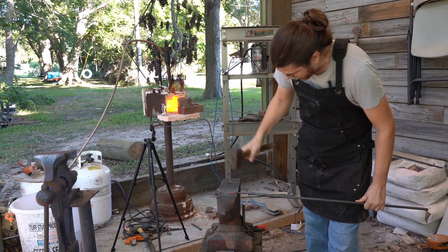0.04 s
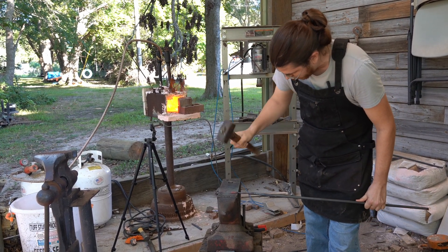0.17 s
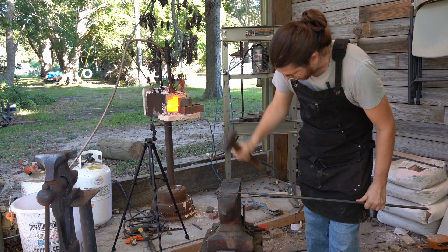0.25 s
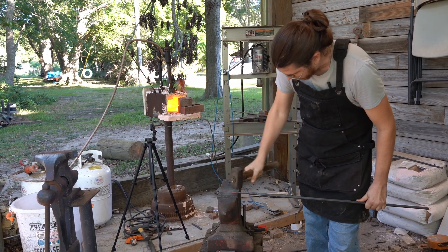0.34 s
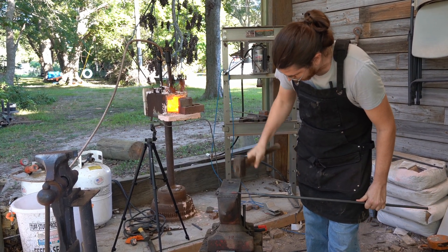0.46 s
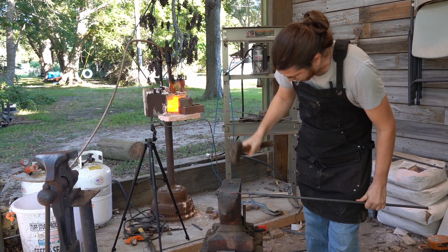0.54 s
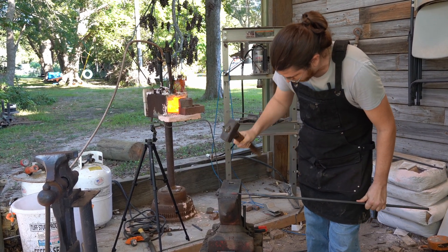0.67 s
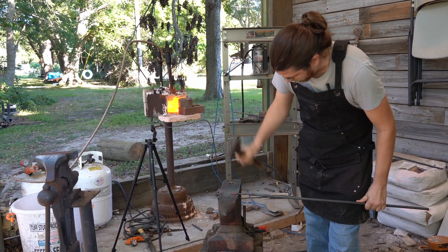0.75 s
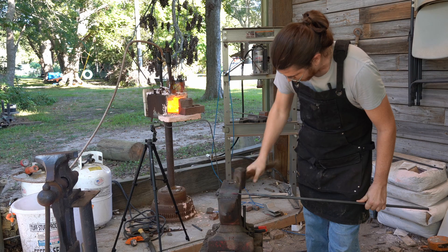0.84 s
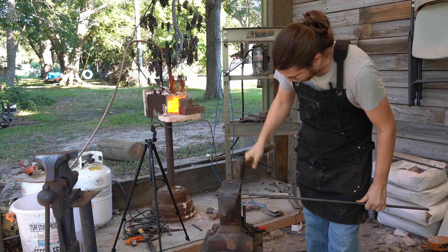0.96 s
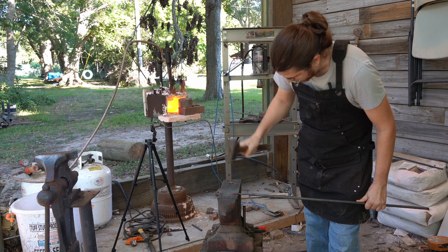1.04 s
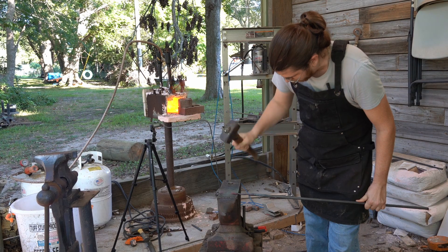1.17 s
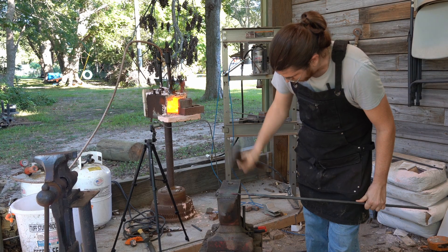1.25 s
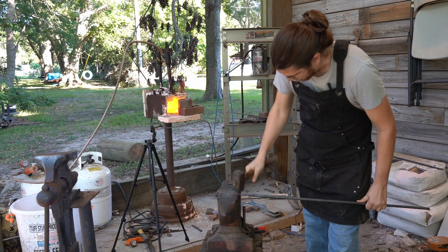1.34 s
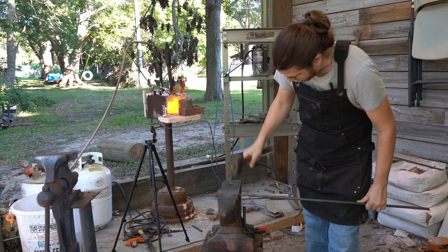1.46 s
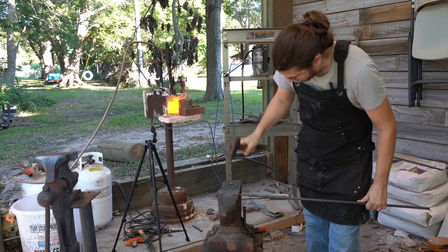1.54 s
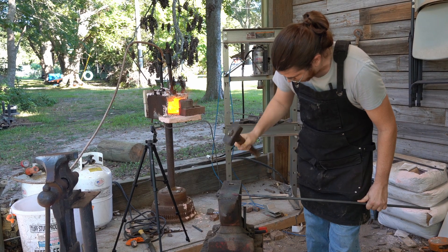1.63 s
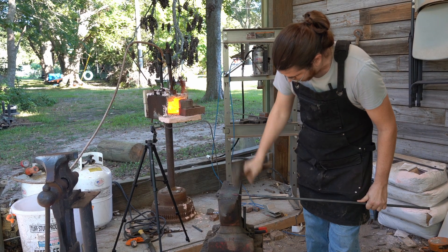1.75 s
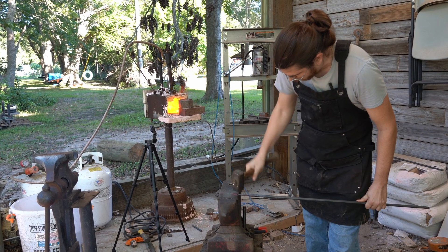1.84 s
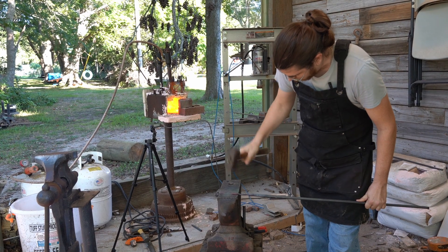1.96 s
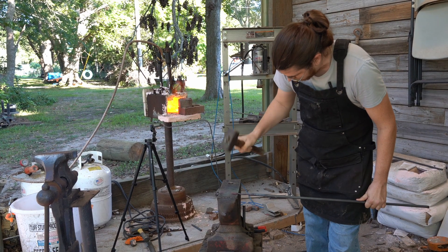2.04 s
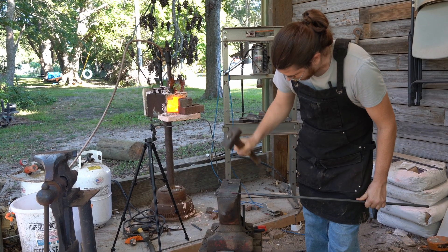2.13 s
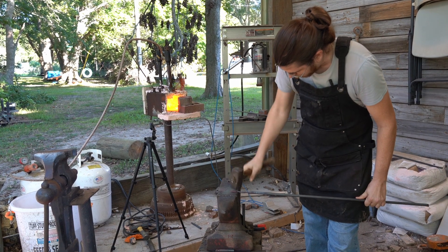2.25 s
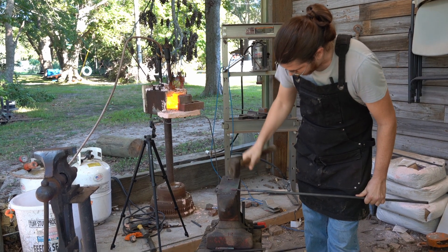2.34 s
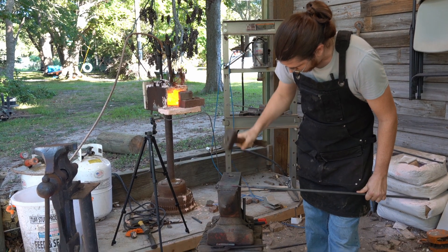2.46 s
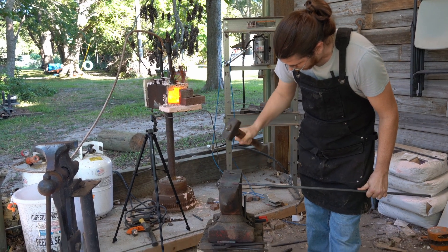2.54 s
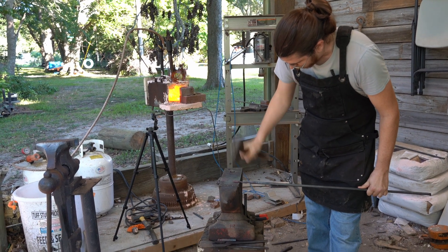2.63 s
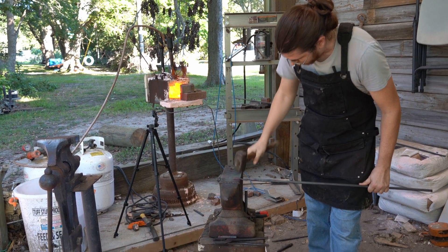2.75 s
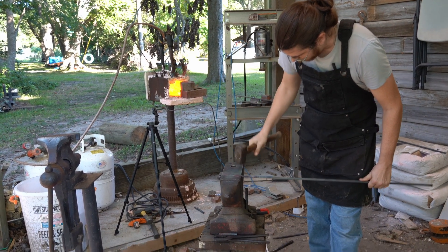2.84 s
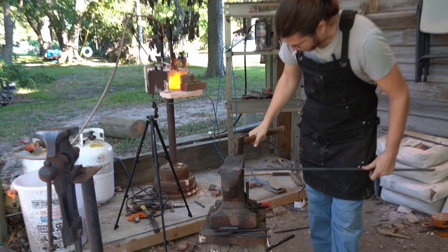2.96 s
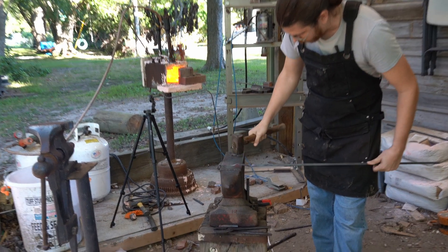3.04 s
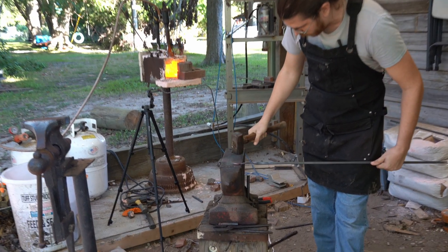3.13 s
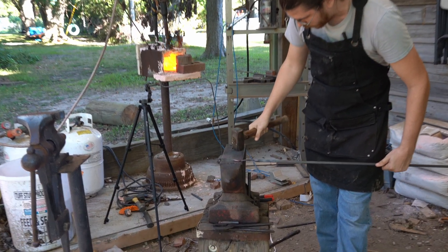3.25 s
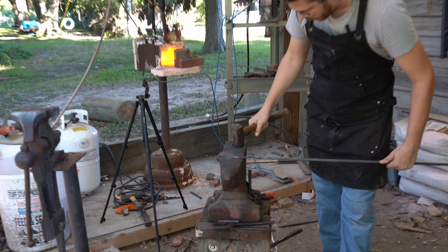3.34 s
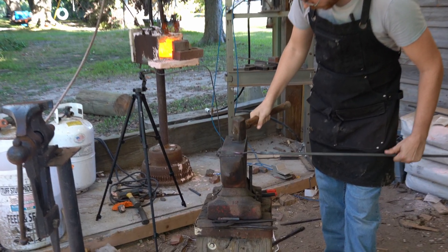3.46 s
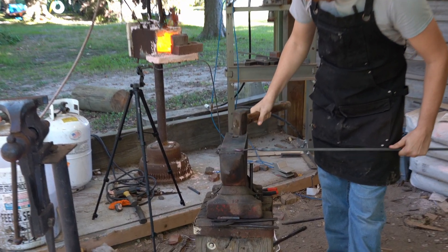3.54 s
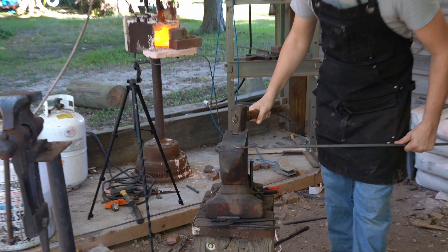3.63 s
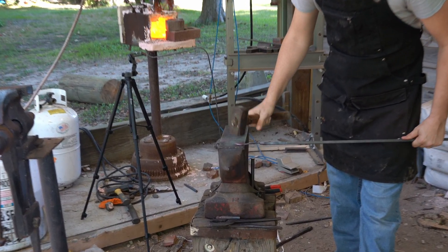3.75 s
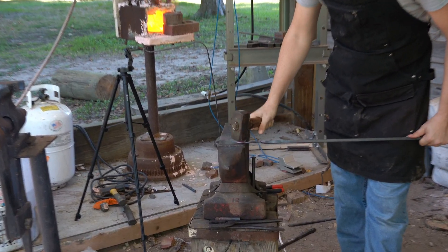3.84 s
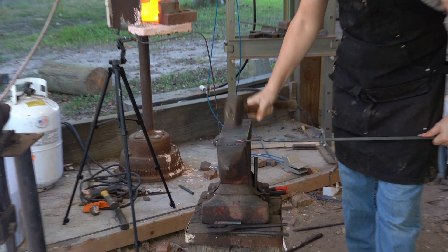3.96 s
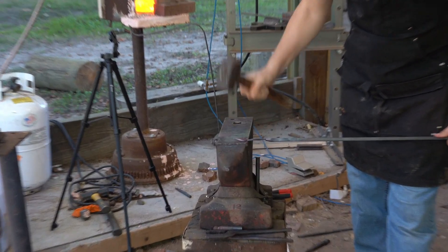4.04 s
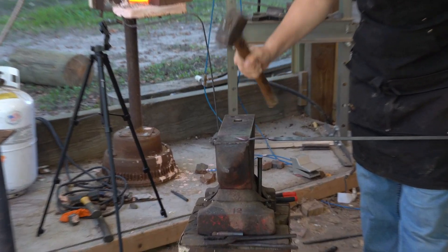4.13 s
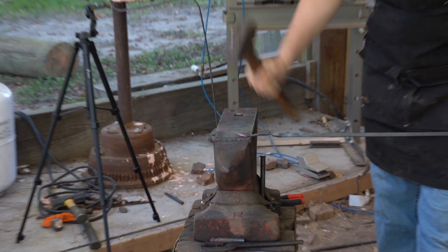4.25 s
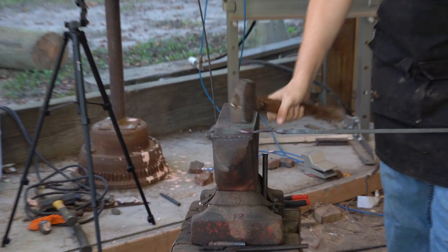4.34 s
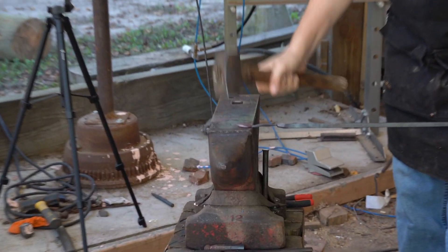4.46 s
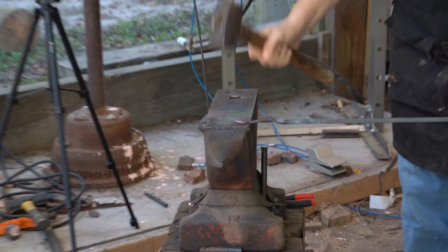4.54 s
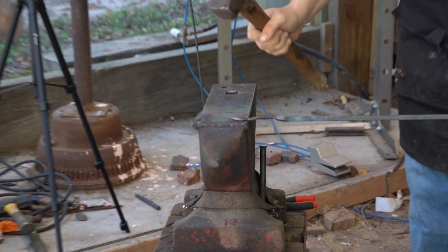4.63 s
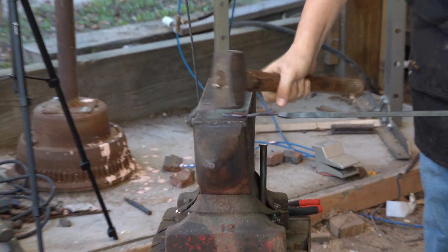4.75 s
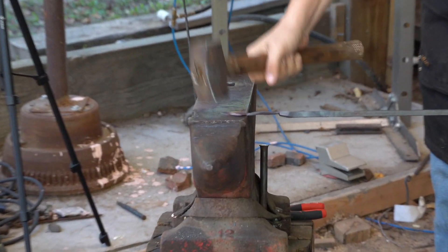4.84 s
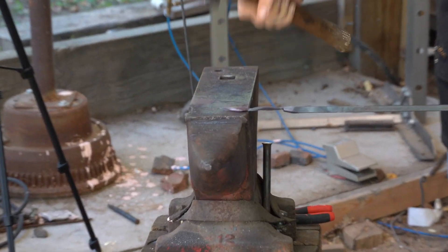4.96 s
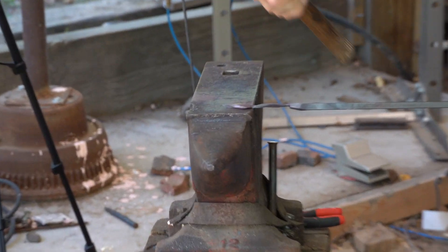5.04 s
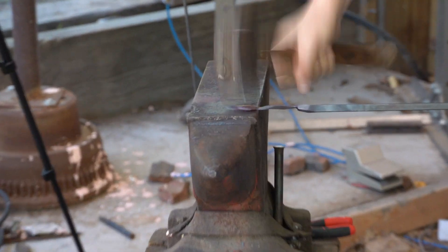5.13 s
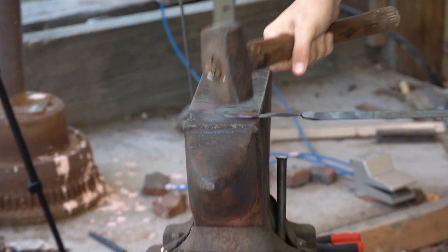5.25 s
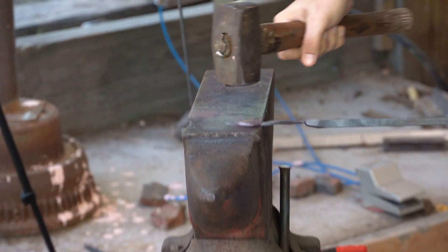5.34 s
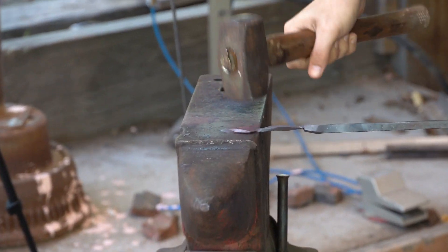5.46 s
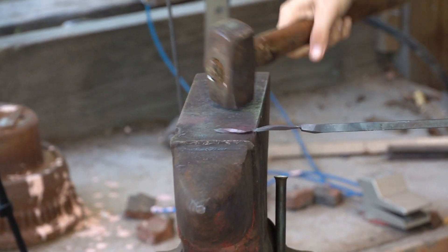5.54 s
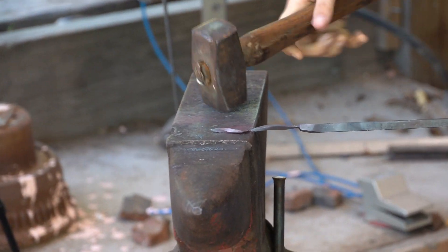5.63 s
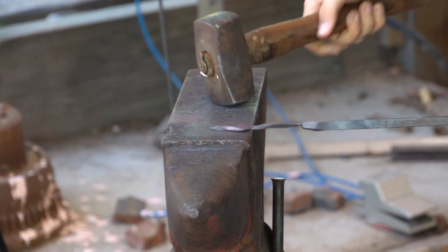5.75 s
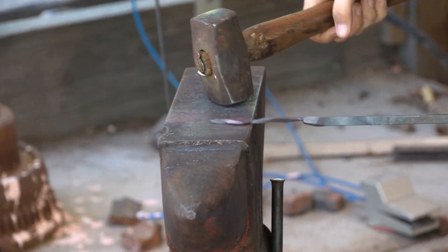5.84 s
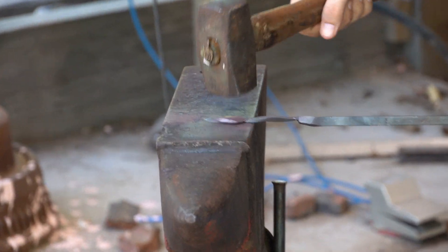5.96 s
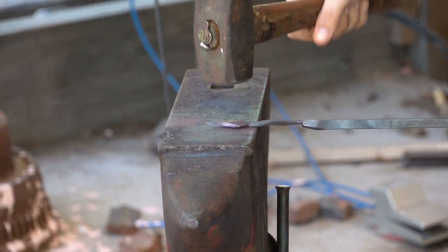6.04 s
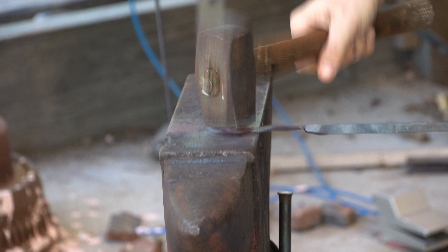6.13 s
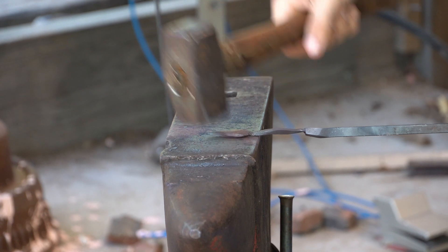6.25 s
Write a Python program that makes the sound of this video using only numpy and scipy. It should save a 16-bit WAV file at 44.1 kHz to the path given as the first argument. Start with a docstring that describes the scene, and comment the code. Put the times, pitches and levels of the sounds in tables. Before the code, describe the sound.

The tail of an earlier blow fades into quiet outdoor rush and hiss. Hammer blows on a hot steel bar land at about 0.4, 0.9, 1.35, 1.8, 2.3 and 2.7 seconds, uneven in force, the first strongest. Each is a blunt midrange thud with a clank just behind it and a short, rough steel ring; most get a small rebound roughly 50 milliseconds later. At 3.13 a light, harder tap hits the bare anvil, with a tiny bounce. A barely audible blow comes at 3.85, then full ones at 4.36, 4.78 and 5.19, the clank brighter as the steel cools. At 5.48 the hammer taps the bare face and bounces at 5.59, 5.68 and 5.72, fading into duller, woody knocks. One last, weaker blow falls at 6.19 with a faint rebound. Soft low thumps lie between; porch reflections are quick, the yard's answer faint. Mono, steady perspective.

```python
"""A smith draws out hot steel with a hand hammer on a small, well-damped anvil, on an open wooden porch.
An earlier blow dies away, then steady blows push dully into the steel, the bar clanks and the anvil rings briefly.
Porch and yard answer over quiet outdoor air; low thumps fall between, and the hammer often drops back once.
Midway it taps the bare anvil face; a soft blow and some full ones follow.
Later it bounces to rest on the bare face, before one last blow. The clank brightens as the steel cools."""
import sys
import numpy as np
from scipy import signal
from scipy.io import wavfile
from scipy.ndimage import uniform_filter1d

SR = 44100
rng = np.random.default_rng(int(sys.argv[2]) if len(sys.argv) > 2 else 0)


def store_pcm(level_fs):
    """Save levels as 16-bit WAV."""
    pcm = np.round(np.clip(level_fs, -1, 1) * 32767).astype(np.int16)
    wavfile.write(sys.argv[1], SR, np.atleast_2d(pcm).T)


N = 277389  # samples
LEAD = SR // 2  # samples of run-up, so that an earlier blow can still be dying away
AGE = np.arange(SR // 3) / SR  # seconds since a blow

# Hammer on the hot bar. Each row: start in seconds, force in dB, how firmly the bar lies on the anvil in dB,
# bar ring in dB before BAR_TRIM_DB.
BAR_BLOWS = [(-.12, -21, 5, -53), (.3720, -24, 6, -50), (0.863, -30.7, 11, -46.5),
             (1.3466, -26.5, -0.5, -48.5), (1.8193, -30.5, -25, -45.5), (2.2781, -26, -10.5, -46.5),
             (2.7208, -23.5, 4.5, -46), (3.8489, -51.5, 6.5, -63.5), (4.3599, -22, 2, -48.5),
             (4.7838, -22.5, -1.5, -55), (5.1884, -23.5, -3, -55), (6.1880, -34.5, -12, -53.5)]
# Hammer dropping back once after a blow. Each row: start in seconds, force in dB, firmness of the bar in dB.
DROP_BACKS = [(0.4308, -41.5, 4.5), (0.9299, -43, -21), (1.3902, -36, 2.5), (1.843, -44, 0),
              (2.3123, -36.5, 2), (2.7741, -34.5, 5.5), (5.2230, -35.5, -14), (6.23, -46, -17)]
# Hammer on the bare anvil face. Each row: start in seconds, force in dB, slackness of the grip from 0 to 1.
FACE_TAPS = [(3.1276, -38.5, 0.25), (3.173, -53.5, 0.4), (5.4846, -33.5, 0), (5.5915, -40, 0.52),
             (5.676, -51.5, 1), (5.724, -61, 0.86)]
# Dull low thumps. Each row: centre in seconds, peak in dB before the final bass roll-off, pitch in Hz.
LOW_THUMPS = [(0.396, -56, 71), (0.519, -54, 104), (2.709, -44, 175), (2.893, -45.5, 89.6),
              (3.601, -58, 50), (4.539, -51, 148), (4.896, -44.5, 560), (5.291, -48.5, 520)]

# Ringing parts. Each row: pitch in Hz, relative level in dB before random scatter,
# t60 in seconds before the added late fade.
BAR_MODES = [(2520, -5, .14), (2760, -8, .1), (3330, -6, .12), (3970, -2, .13), (4400, -3, .12),
             (5225, 0, .14), (5550, 0, .14), (5720, -7, .13), (6030, -9, .12), (6770, -9, .13),
             (7100, -8, .12), (7510, -11, .12), (7950, -13, .12), (8600, -11, .12), (9400, -18, .12)]
ANVIL_MODES = [(1825, -15, .25), (1851, -15, .22), (1884, -11, .26), (1989, -16, .2), (2325, -11, .2),
               (2363, 0, .26), (2400, -12, .18), (2454, -9, .2), (2487, -6, .25), (2514, -6.5, .25),
               (2557, -14, .2), (3730, -12, .13), (4128, -14, .15), (4322, -15, .18), (7972, -27, .18),
               (10200, -31, .16), (11130, -29, .18), (12026, -32, .22), (12135, -28, .24)]
STAND_MODES = [(248, -13, 0.251), (304, -4, 0.2), (330.7, -6, 0.2), (401.6, -1.5, 0.22), (571.3, 3.5, 0.11),
               (662, -3, 0.2), (851, 2, 0.1), (794, 1.5, 0.26), (1196, -6, 0.38), (1319, -2, 0.42),
               (1411, -1, 0.34)]  # the stand under the anvil
HEAD_MODES = [(1989, -3, .14), (2490, -2, .12), (3750, -11, .13), (4350, -13, .18), (4795, 0, .24),
              (4845, -3, .18), (4960, -7, .13), (5025, -3, .13)]  # the hammer's steel head
HANDLE_MODES = [(500, -11, .09), (890, -8, .08), (935, 0, .14), (1841, -9, .13), (2062, -7, .13),
                (2200, -10, .1)]  # the hammer's wooden handle

# Tone of the push and of the clank. Each row: frequency in Hz, relative level in dB before the shelves.
PUSH_SPECTRUM = [(20, -38.5), (45, -30), (100, -29.5), (190, -24.5), (350, -3.5), (550, 0.5), (850, 0.5),
                 (1200, 0), (1900, -7.5), (2800, -22), (6000, -31.5), (16000, -54)]
CLANK_SPECTRUM = [(200, -19), (900, -1.5), (2000, 3), (3000, -6), (4000, -0.5), (5600, -1), (7000, -8),
                  (9000, -20), (12000, -22.5), (16000, -27.5)]
# Tone of the porch's quick answer and the yard's long one. Each row: frequency in Hz, level in dB.
PORCH_LEVELS = [(60, 0), (150, -10), (300, 8.5), (550, -4), (850, -13), (1400, -9.5), (2000, 0), (3000, 1),
                (5500, -4), (9000, -2.5), (15000, -6.5)]
YARD_LEVELS = [(50, -2), (100, 9.5), (250, -6), (800, -20), (2000, -17.5), (5500, -12.5), (14000, -10)]
# Decay of the two answers. Each row: frequency in Hz, t60 in seconds.
PORCH_DECAYS = [(100, 0.23), (400, 0.13), (1500, 0.19), (5000, 0.16), (14000, 0.28)]
YARD_DECAYS = [(100, 0.84), (500, 0.56), (2000, 0.69), (6000, 0.53), (14000, 0.57)]
# Tone of the outdoor air. Each row: frequency in Hz, relative level per Hz in dB.
AIR_SPECTRUM = [(15, -43), (25, -23.5), (38, -11), (113, -3), (260, -3), (368, -2), (469, -4.5), (537, -4),
                (703, -8), (3170, -12), (12200, -12), (15500, -13)]
# Sound of a tap, one row each for clank, anvil, head and handle.
# Each row: level in a tight grip, level in a slack grip, both in dB relative to the force.
GRIP_MIX = [(-3.5, -41), (-6.5, -23), (-8, -26.5), (-21, 5.5)]

FULL_DB = -27.5  # force of an ordinary blow
# Bass of a blow: hot steel yields and thuds; it hardens as it cools, and a heavy blow meets more resistance.
THUD_DB, THUD_DB_PER_S, THUD_PER_FORCE = 6, -1.29, -0.41
BRIGHT_DB, BRIGHT_DB_PER_S = -1, 0.8  # treble of the clank, rising as the steel cools
CLANK_DB, CLANK_PER_FIRM = -6, 0.29  # a bar that lies firmly clanks louder
ANVIL_DB, STAND_DB = -15.5, -21.5  # rings relative to the force, before firmness and bass are added
BAR_TRIM_DB = 1.5
# A drop back has less clank and bass but more anvil than a full blow of its force.
REBOUND_CLANK_DB, REBOUND_THUD_DB, REBOUND_ANVIL_DB = -4.5, -6, 4
REBOUND_BAR_DB = -28  # bar ring relative to the force, before BAR_TRIM_DB
AIR_DB = -68  # level of the air before the final filters
THUMP_CYCLES = 0.63  # cycles from a thump's centre until it has faded to 1/e
EDGE_HZ = 15900  # upper band limit


def amp(db):
    """Decibels to gain."""
    return 10 ** (np.asarray(db) / 20)


def unit(x):
    """Scales to an energy of one."""
    return x / np.sqrt(np.sum(x ** 2) + 1e-20)


def read(points, hz):
    """Reads a table on a log-frequency axis."""
    f, value = np.transpose(points)
    return np.interp(np.log(hz + 1), np.log(f + 1), value)


def add(mix, s, sound):
    """Mixes a sound in at time s, in seconds."""
    part = mix[max(LEAD + round(s * SR), 0):][:len(sound)]
    part += sound[:len(part)]


def pulse(spectrum, bass_db=0, treble_db=0, size=4096):
    """The most compact causal pulse (minimum phase) with a given spectrum, plus bass and treble shelves."""
    hz = abs(np.fft.fftfreq(size, 1 / SR))
    bass_shelf = bass_db / (1 + (hz / 1000) ** 4)
    treble_shelf = treble_db * (1 - 1 / (1 + (hz / 7500) ** 6))
    log_gain = np.log(amp(read(spectrum, hz) + bass_shelf + treble_shelf))
    # the Hilbert transform of the log gain gives the minimum phase
    response = np.exp(np.conj(signal.hilbert(log_gain)))
    return unit(np.fft.ifft(response).real)


def burst(x, db):
    """Sets a short sound's level, with its energy counted over five milliseconds."""
    return amp(db) * np.sqrt(.005 * SR) * unit(x)


def push(db, bass_db, echo_s=0.001168, echo_db=-7, scatter_db=-13):
    """The air pulse of the stopping hammer, its echo off the anvil's foot, and scatter off the stand."""
    direct = np.pad(pulse(PUSH_SPECTRUM, bass_db), (0, SR // 20))
    echo = np.roll(direct, round(echo_s * SR))
    t = AGE[:len(direct)]
    scatter = rng.standard_normal(len(t)) * np.exp(-t / 0.0023) * (t > echo_s)
    scatter = unit(signal.fftconvolve(scatter, direct)[:len(t)])
    return burst(direct + amp(echo_db) * echo + amp(scatter_db) * scatter, db)


def clank(db, bright_db=0, crack_s=0.0017, crash_t60=0.057, crash_db=-5, count=110):
    """A crack of steel on steel, then a dense crash of short modes that shift as the work is turned and flattened."""
    t = AGE[:SR // 8]
    crack = rng.standard_normal(len(t)) * np.exp(-t / crack_s)
    # one mode at a random place in each of many even bands
    hz = 1500 + (np.arange(count) + rng.random(count)) * 14000 / count
    modes = np.sin(2 * np.pi * (hz[:, None] * t + rng.random((count, 1))))
    crash = modes.sum(0) * amp(-60 * t / crash_t60)
    onset = 1 - np.exp(-t / 0.0001)
    contact = (unit(crack) + amp(crash_db) * unit(crash)) * onset
    colour = pulse(CLANK_SPECTRUM, treble_db=bright_db)
    return burst(signal.fftconvolve(contact, colour)[:len(t)], db)


def ring(modes, db, scatter_db=1.0, rise=0.00039, fade_s=0.27, order=250):
    """Dying modes, roughened by steel chattering on steel; each ring falls slowly at first, then fast."""
    hz, mode_db, t60 = np.transpose(modes)[:, :, None]
    scattered_db = mode_db + scatter_db * rng.standard_normal(hz.shape)
    share = amp(scattered_db - 60 * AGE / t60)
    # smoothed noise wobbles each mode in both level and phase
    noise = rng.standard_normal((2, len(hz), len(AGE)))
    chatter = uniform_filter1d(noise, order, axis=2) * np.sqrt(order)
    rough = 1 + .42 * (chatter[0] + 1j * chatter[1])
    waves = (rough * np.exp(2j * np.pi * (hz * AGE + rng.random(hz.shape)))).imag
    onset = 1 - np.exp(-AGE / rise)
    fade = np.exp(-(AGE / fade_s) ** 2)
    return amp(db) * onset * fade * (share * waves).sum(0)


def blow(s, force_db, firm_db, bar_db, clank_db=0, thud_db=0, anvil_db=0, squash_s=.0004):
    """One blow on the bar as (start, impact, ringing); the hot steel yields first, so the clank trails the push."""
    bass_db = THUD_DB + THUD_DB_PER_S * s + THUD_PER_FORCE * (force_db - FULL_DB) + thud_db
    thud = push(force_db - 2.5, bass_db)
    clank_level = force_db + CLANK_DB + CLANK_PER_FIRM * firm_db + clank_db
    crash = clank(clank_level, BRIGHT_DB + BRIGHT_DB_PER_S * s)
    anvil = ring(ANVIL_MODES, force_db + ANVIL_DB + firm_db + anvil_db, rise=0.00207, fade_s=0.14)
    stand = ring(STAND_MODES, force_db + bass_db + STAND_DB, fade_s=0.073)
    bar = ring(BAR_MODES, bar_db + BAR_TRIM_DB)
    return [(s, thud, anvil + stand), (s + squash_s, crash, bar)]


def tail(level_db, t60, rise):
    """Dense echoes that build up, each band dying at its own speed."""
    t = np.arange(SR) / SR
    taps = rng.standard_normal(SR) * (rng.random(SR) < .15)  # sparse random reflections
    hz, frame_s, z = signal.stft(taps / taps.std(), SR, nperseg=512)
    decay = read(t60, hz)[:, None]
    fade = amp(read(level_db, hz)[:, None] - 60 * frame_s / decay)
    energy_scale = np.sqrt(2 * np.log(1000) / (decay * SR))  # evens out long and short decays
    reflections = signal.istft(z * fade * energy_scale, SR, nperseg=512)[1][:SR]
    return reflections * (1 - np.exp(-(t / rise) ** 2))


def echoes(x, level_db, t60, rise, count=7):
    """Crossfades through several random echo patterns, so no single one colours all the blows."""
    place = np.linspace(0, count - 1, len(x))
    wet = np.zeros(len(x))
    for k in range(count):
        share = np.cos(np.pi / 2 * np.clip(place - k, -1, 1))
        wet += signal.oaconvolve(x * share, tail(level_db, t60, rise))[:len(x)]
    return wet


def porch(x):
    """The porch's quick answer: dense reflections that build up within about 10 ms."""
    return echoes(x, PORCH_LEVELS, PORCH_DECAYS, rise=0.01)


def yard(x):
    """The yard's long answer; the trees stand far off, so it swells late."""
    return echoes(x, YARD_LEVELS, YARD_DECAYS, rise=0.058)


def air():
    """Quiet outdoor rush and hiss from shaped noise; the low part drifts in soft patches."""
    hz, _, z = signal.stft(rng.standard_normal(N), SR, nperseg=2048)
    patches = uniform_filter1d(rng.standard_normal(z.shape), 8, axis=0)  # smooth across frequency
    patches = uniform_filter1d(patches, 10, axis=1)  # smooth across time
    drift_db = 2.7 * patches / patches.std() / (1 + hz[:, None] / 1500)
    gain = amp(read(AIR_SPECTRUM, hz)[:, None] + drift_db)
    rush = signal.istft(z * gain, SR, nperseg=2048)[1][:N]
    return amp(AIR_DB) * rush / rush.std()


def thumps():
    """Soft low thuds of a cycle or two each: cosines under a bell-shaped swell."""
    out = np.zeros(LEAD + N)
    t = np.arange(-SR // 10, SR // 10) / SR
    for s, db, hz in LOW_THUMPS:
        swell = np.exp(-(t * hz / THUMP_CYCLES) ** 2)
        add(out, s + t[0], amp(db) * swell * np.cos(2 * np.pi * hz * t))
    return out


def rebound(s, force_db, firm_db):
    """The hammer drops back onto the bar, with less clank and bass and more of the anvil."""
    bar_db = force_db + REBOUND_BAR_DB
    return blow(s, force_db, firm_db, bar_db, REBOUND_CLANK_DB, REBOUND_THUD_DB, REBOUND_ANVIL_DB)


def tap(s, force_db, slack):
    """With no soft metal under it the hammer rings too; a slack grip dulls the steel and frees the handle."""
    tight_db, slack_db = np.transpose(GRIP_MIX)
    mix_db = tight_db + (slack_db - tight_db) * np.clip(slack, 0, 1)
    clank_db, anvil_db, head_db, handle_db = force_db + mix_db
    anvil = ring(ANVIL_MODES, anvil_db, fade_s=0.079)
    stand = ring(STAND_MODES, force_db - 19.5, fade_s=0.045)
    hammer = ring(HEAD_MODES, head_db, fade_s=0.061) + ring(HANDLE_MODES, handle_db)
    thud = push(force_db + .5, bass_db=-8)
    return [(s, thud, anvil + stand), (s, clank(clank_db, bright_db=-35), hammer)]


def hammering():
    """All blows, rebounds and taps, as their sharp impacts and the ringing that follows."""
    hits = []
    for row in BAR_BLOWS:
        hits += blow(*row)
    for row in DROP_BACKS:
        hits += rebound(*row)
    for row in FACE_TAPS:
        hits += tap(*row)
    impacts, rings = np.zeros((2, LEAD + N))
    for s, impact, ringing in hits:
        add(impacts, s, impact)
        add(rings, s, ringing)
    return impacts, rings


def scene():
    """The hammering and thumps, the answers of porch and yard, and the air."""
    impacts, rings = hammering()
    radiated = impacts + amp(-20) * rings  # the ringing hardly stirs the echoes
    sounds = impacts + rings + thumps() + porch(radiated) + yard(radiated)
    return (sounds[LEAD:] + air())[None]


def record(dry):
    """The microphone's bass roll-off and the recorder's band limit."""
    roll_off = signal.butter(3, 42, "highpass", fs=SR, output="sos")
    lean = signal.sosfilt(roll_off, dry)
    band_limit = signal.firwin(511, EDGE_HZ, window=("kaiser", 9), fs=SR)
    return signal.oaconvolve(lean, band_limit[None], "same")


dry = scene()
out = record(dry)
store_pcm(out)
```